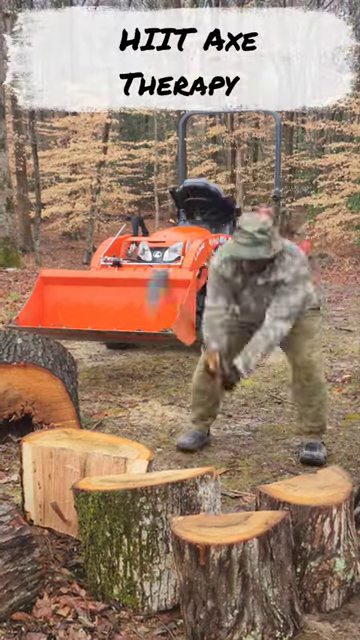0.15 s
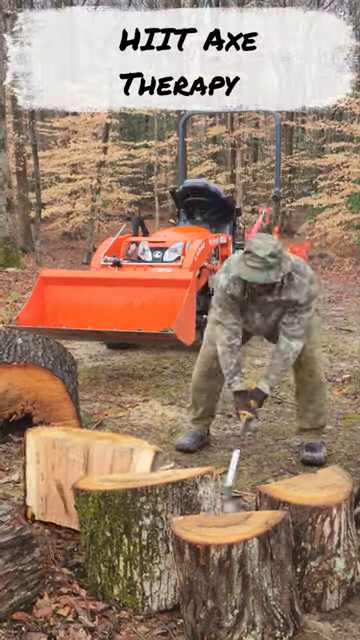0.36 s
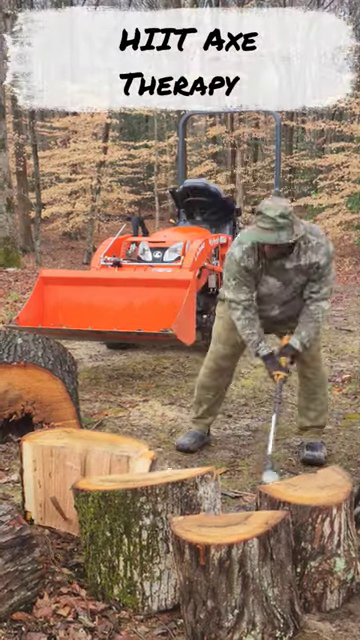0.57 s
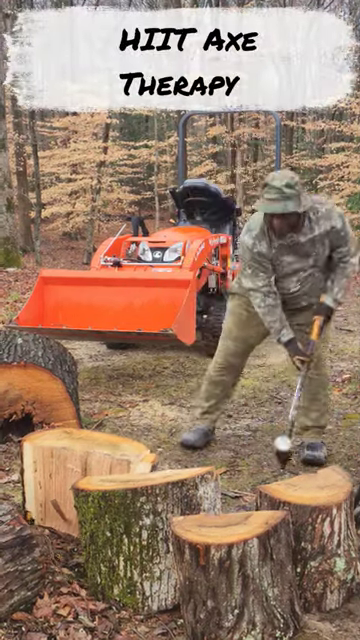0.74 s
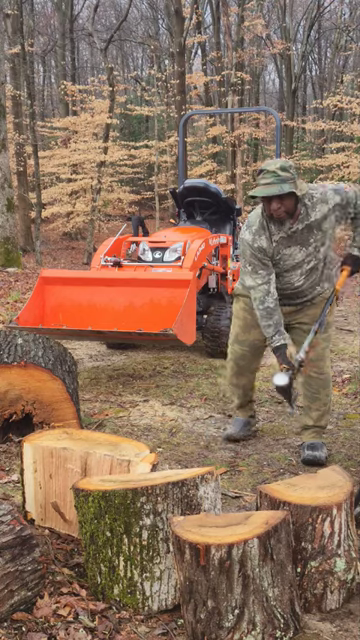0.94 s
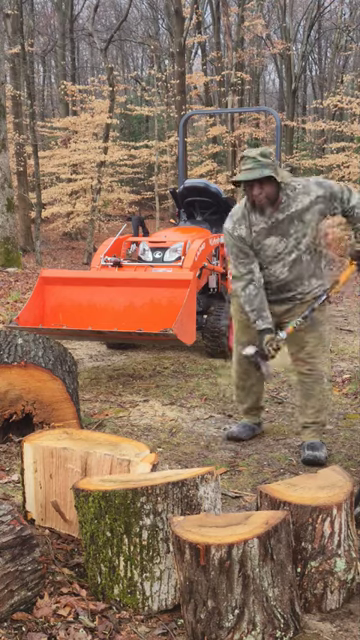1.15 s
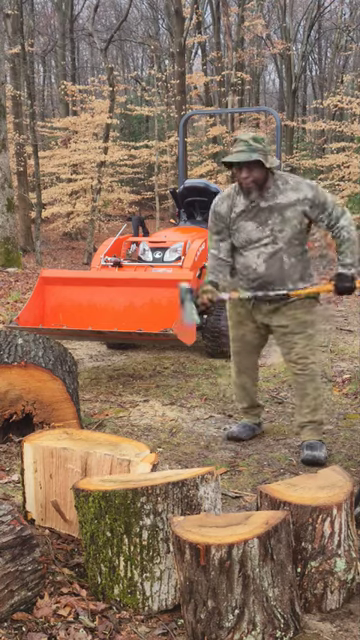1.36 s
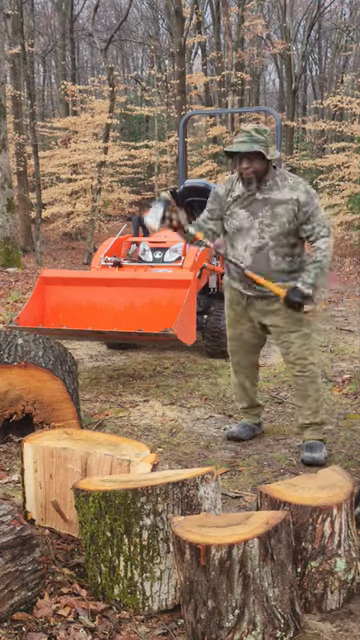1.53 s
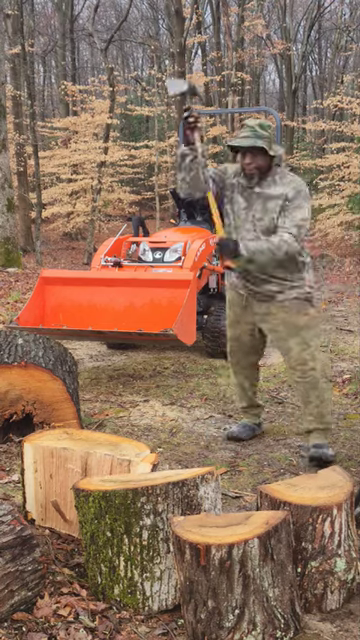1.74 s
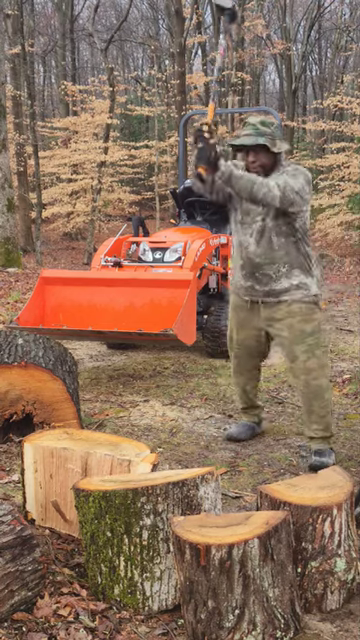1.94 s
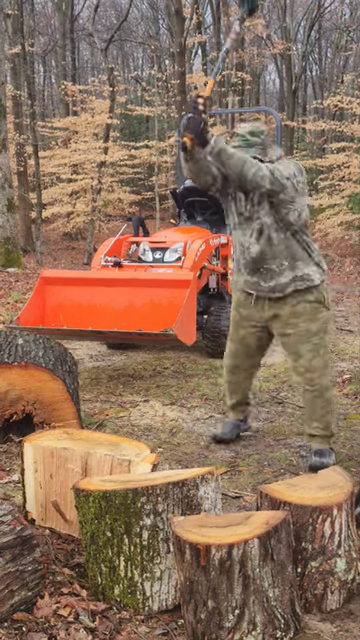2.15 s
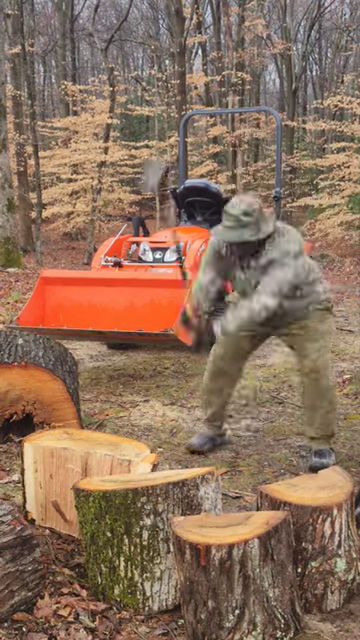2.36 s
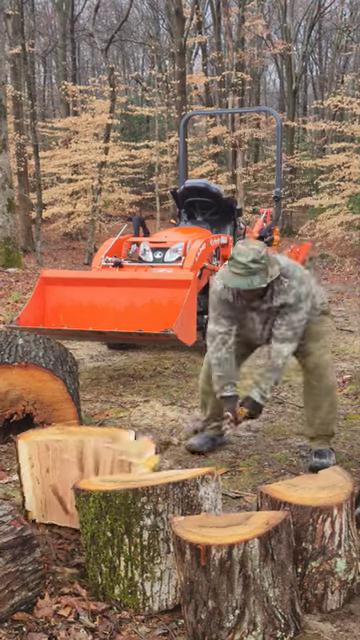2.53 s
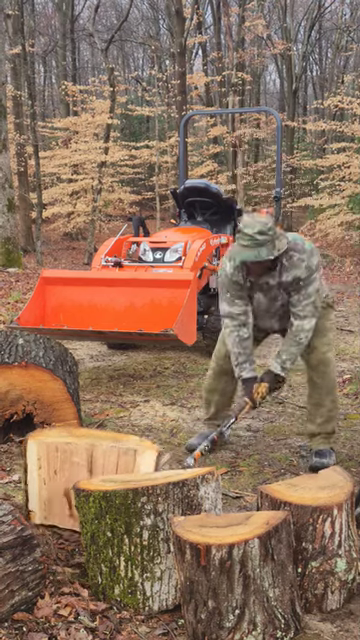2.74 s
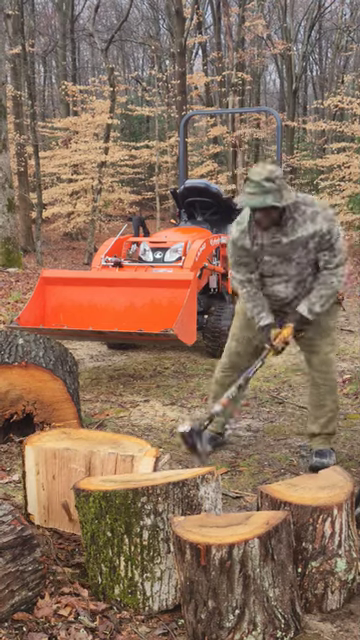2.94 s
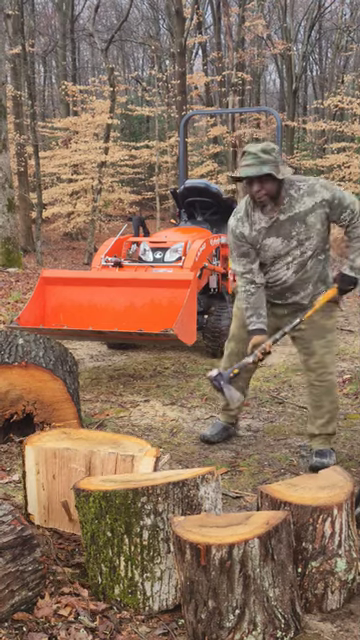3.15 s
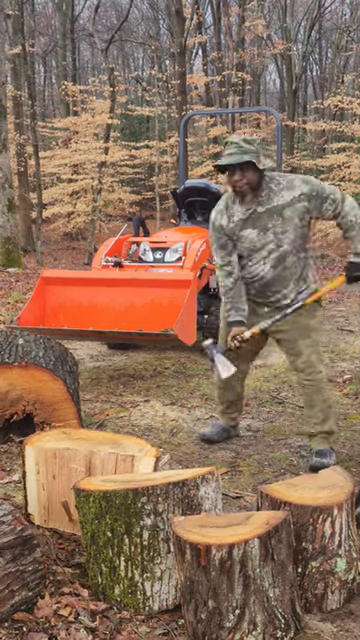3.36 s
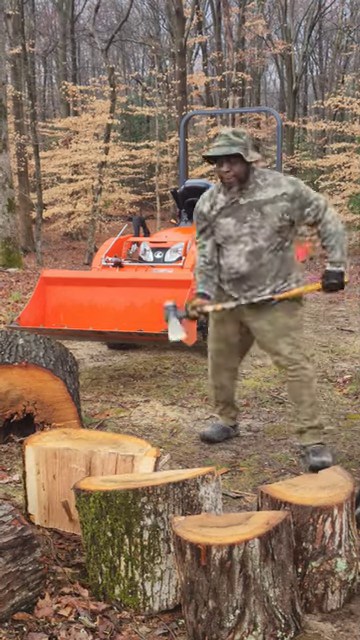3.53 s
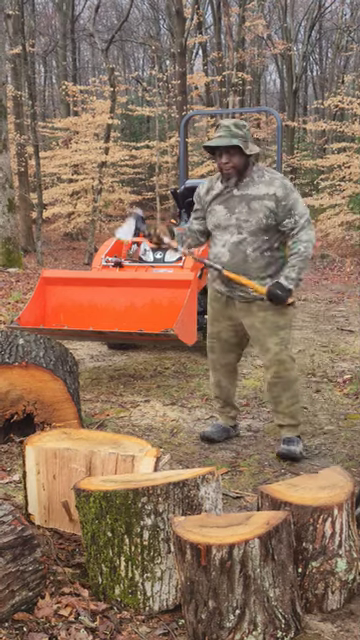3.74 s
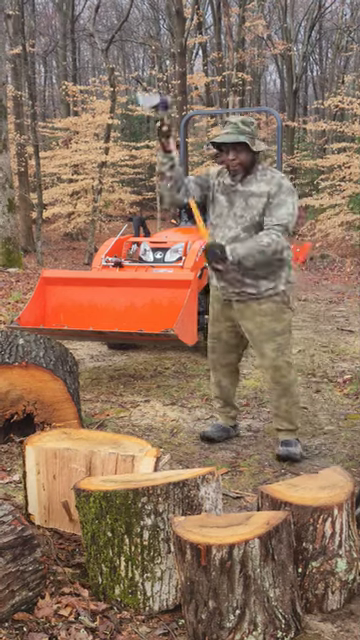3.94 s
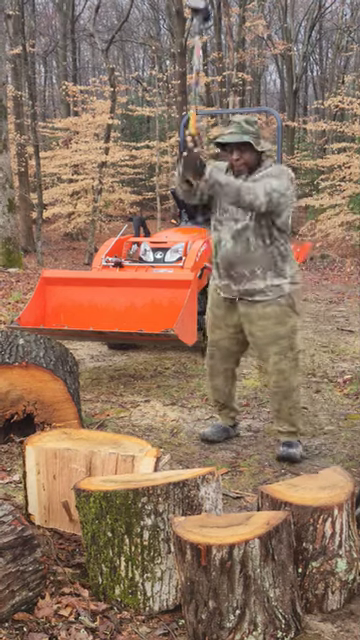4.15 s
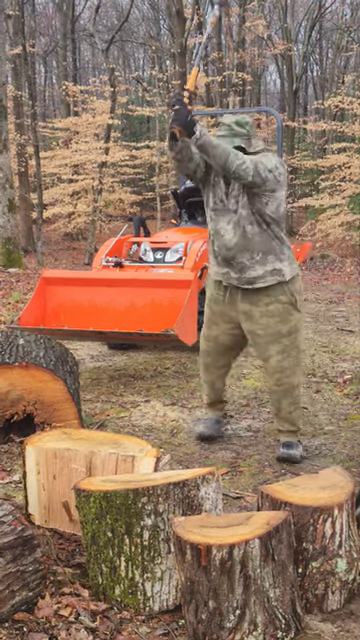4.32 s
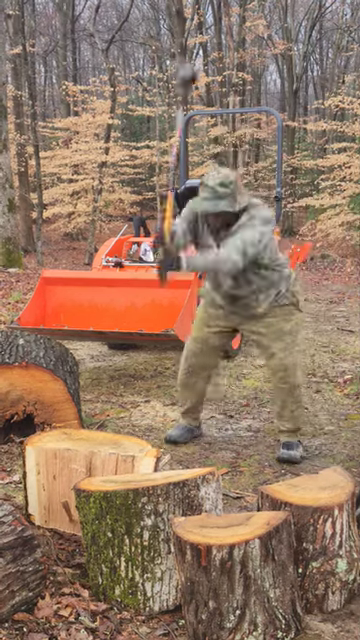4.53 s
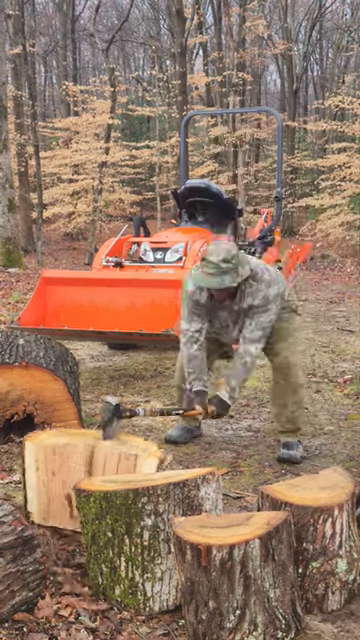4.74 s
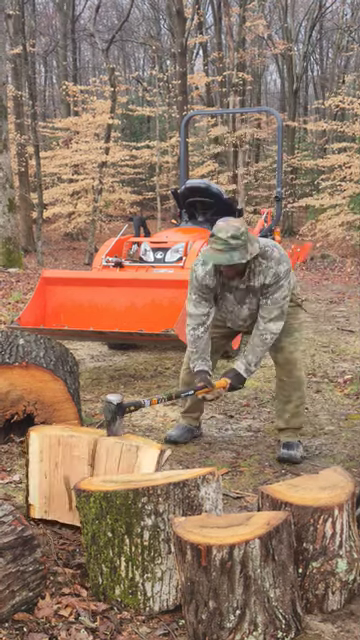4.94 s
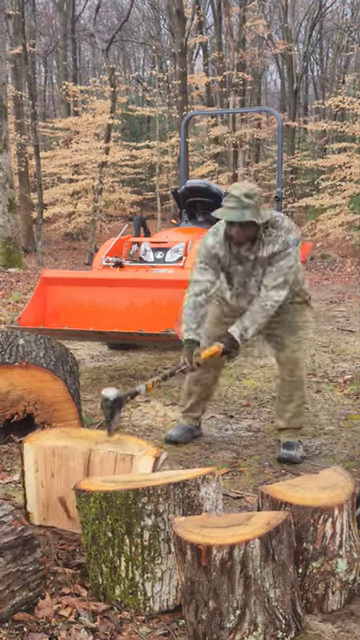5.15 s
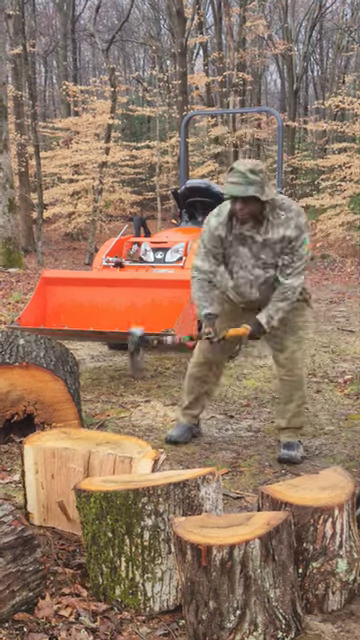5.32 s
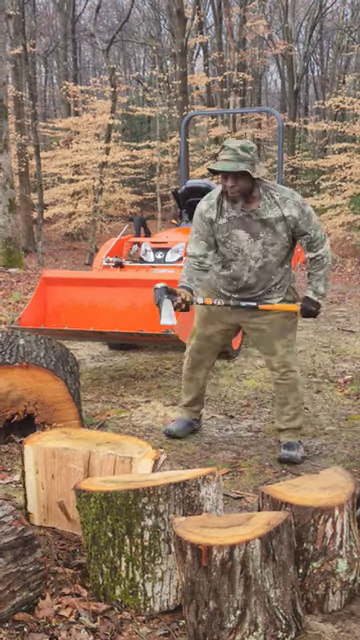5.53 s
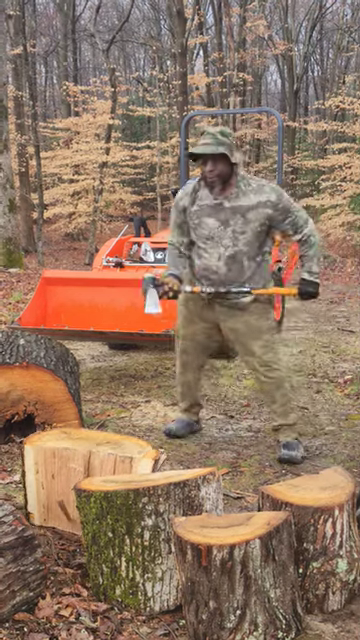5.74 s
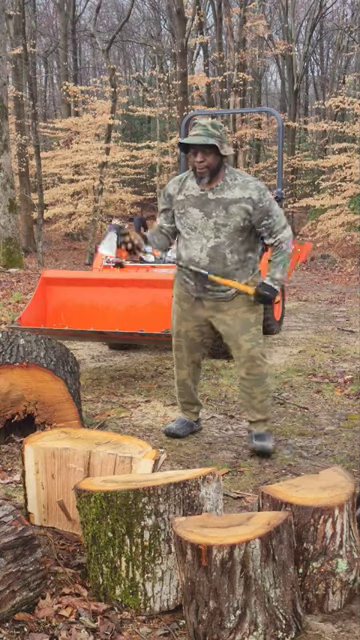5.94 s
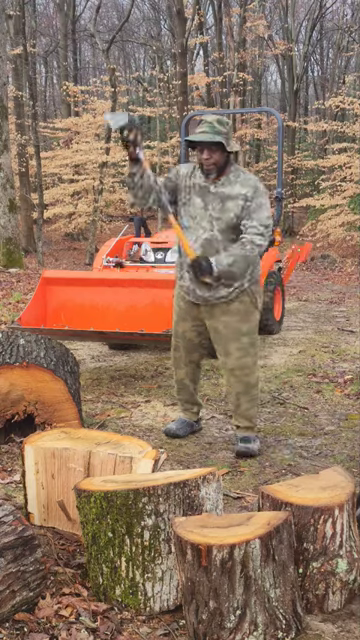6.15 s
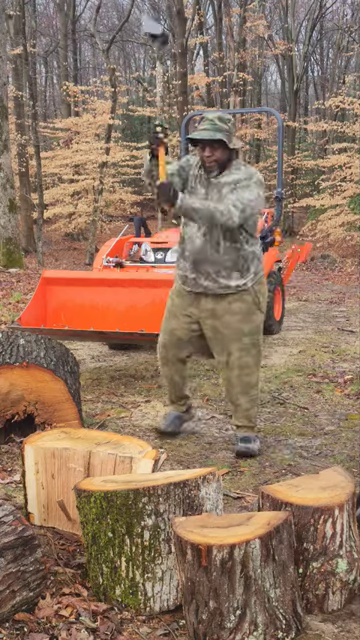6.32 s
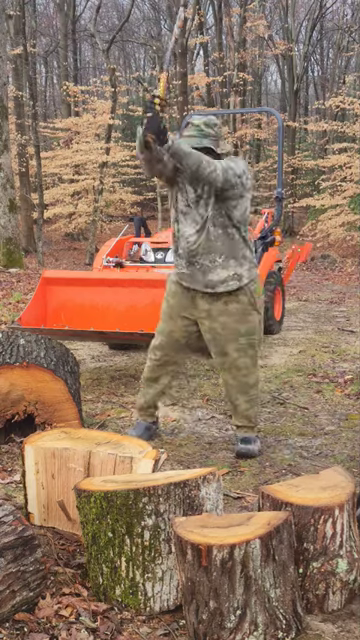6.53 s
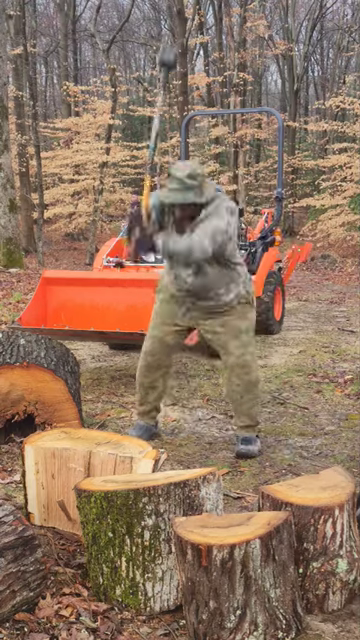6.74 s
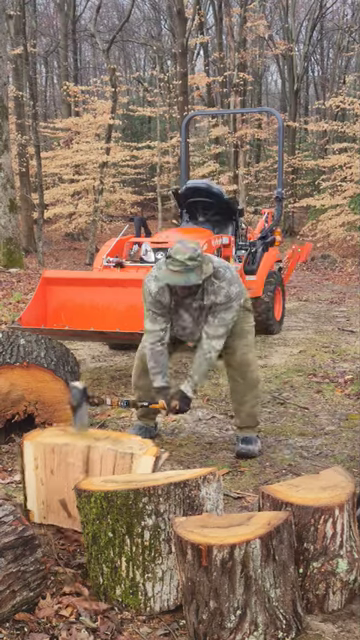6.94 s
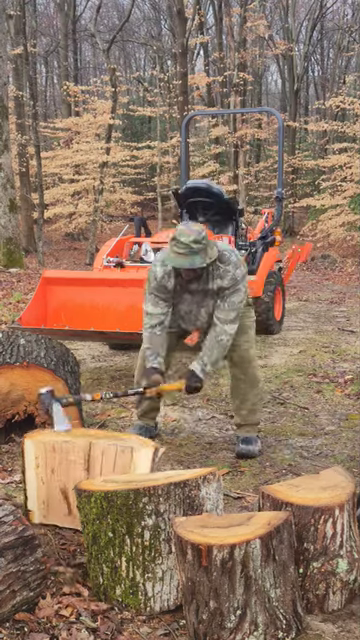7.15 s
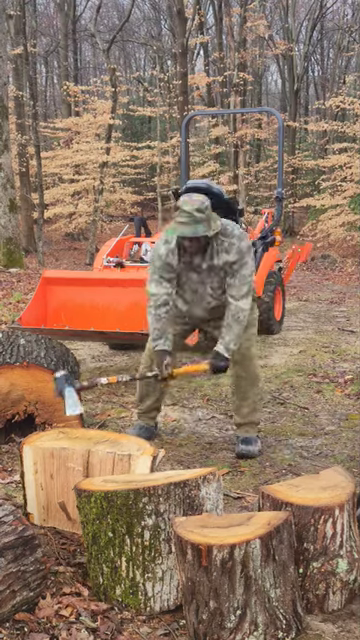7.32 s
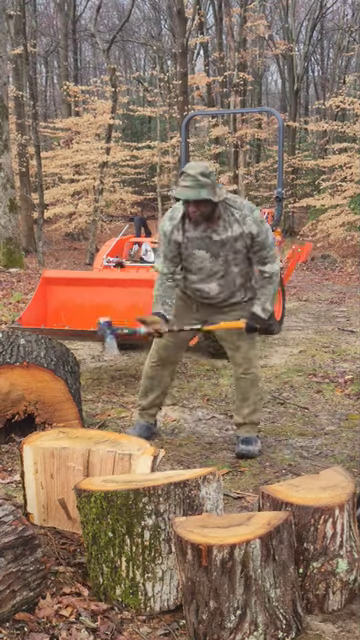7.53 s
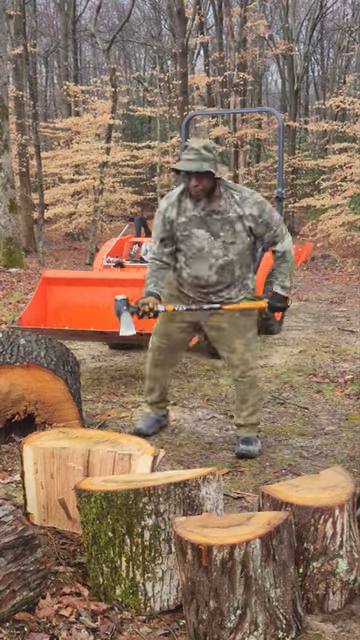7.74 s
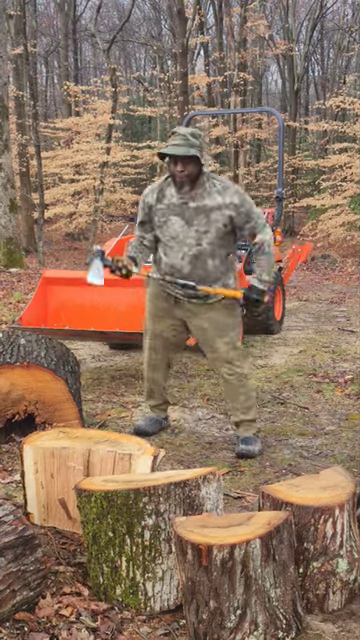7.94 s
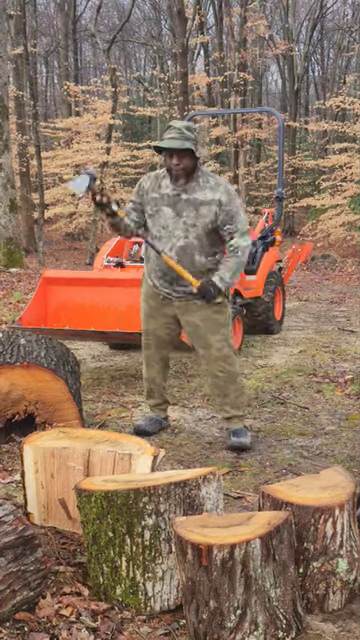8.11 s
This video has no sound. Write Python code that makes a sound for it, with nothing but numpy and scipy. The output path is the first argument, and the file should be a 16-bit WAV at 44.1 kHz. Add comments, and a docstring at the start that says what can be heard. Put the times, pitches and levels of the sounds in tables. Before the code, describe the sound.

An axe strikes a hardwood log four times, about two seconds apart, close to the microphone in the woods. Each sharp whack carries a crunch of fibres, a slight steel ring and a short echo, and some are followed by lighter knocks and falling chips. Between blows a jacket swishes and a glove rubs softly along the handle. Distant traffic rumbles low throughout, with very faint frog peeps and crow caws.

```python
"""A jacket swishes over a low rumble, then a splitting axe bites into a hardwood log, four times in all.
Each blow rings the log and the steel, tears fibres and thumps the ground; splinters scatter and the trunks
of the winter wood echo. Between blows a glove rubs along the handle and the jacket rustles again.
The rumble is distant traffic; far off, too, frogs peep and a crow caws."""
import sys
import numpy as np
from scipy import signal
from scipy.fft import rfft, irfft, next_fast_len
from scipy.io import wavfile
from scipy.ndimage import uniform_filter1d

SR = 44100
rng = np.random.default_rng(int(sys.argv[2]) if len(sys.argv) > 2 else 0)


def bounce(signal):
    """Save signal as a 16-bit WAV file at the path given by the first command-line argument."""
    frames = np.transpose(np.atleast_2d(signal))
    limited = np.clip(frames, -1, 1)
    pcm = np.round(limited * 32767).astype(np.int16)
    wavfile.write(sys.argv[1], SR, pcm)


N = 360738


def amp(db):
    """Turn decibels into a gain. Table levels are relative; a fade time (t60) is a drop of 60 dB."""
    return 10 ** (np.asarray(db) / 20)


def unit(x):
    """Scale x to an average strength (rms) of 1."""
    return x / np.sqrt(np.mean(x ** 2) + 1e-20)


def along(points, hz):
    """Read between (frequency, value) points on a log frequency axis."""
    f, v = np.transpose(points)
    return np.interp(np.log(hz + 1), np.log(f + 1), v)


def clock(length):
    """Sample times over a length in seconds."""
    return np.arange(int(length * SR)) / SR


def add(track, s, x):
    """Mix x into the track at s seconds."""
    i = max(round(s * SR), 0)
    track[..., i:i + x.shape[-1]] += x[..., :track.shape[-1] - i]


def filtered(x, response):
    """Turn each frequency of x up or down by response(hz)."""
    m = next_fast_len(x.shape[-1] + SR // 10)
    return irfft(rfft(x, m) * response(np.fft.rfftfreq(m, 1 / SR)), m)[..., :x.shape[-1]]


def noise(spectrum, shape, grain_db=0):
    """Noise with a given tone colour, made grainy by uneven sample sizes."""
    x = rng.standard_normal(shape) * amp(grain_db * rng.standard_normal(shape))
    return unit(filtered(x, lambda hz: amp(along(spectrum, hz))))


def burst(spectrum, t, apart, grain_db):
    """Stereo noise; apart sets how much left and right differ."""
    common, own = noise(spectrum, (2, len(t)), grain_db)
    return unit(np.array([common + apart * own, common - apart * own]))


def ring(modes, t, scatter_db=0):
    """The fading tones (modes) of a struck object; neighbours swing in opposite directions."""
    return sum((-1) ** k * amp(db + scatter_db * rng.standard_normal() - 60 * t / t60)
               * np.sin(2 * np.pi * hz * t) for k, (hz, db, t60) in enumerate(modes))


def jolt(t, hz, width):
    """One or two swings around t = 0, with no ring after them."""
    return np.sin(2 * np.pi * hz * t) * np.exp(-(t / width) ** 2 / 2)


# How alike left and right are: f/Hz, likeness (1 = the same)
LIKENESS = [(100, 1), (350, 0.86), (700, 0.43), (1400, 0.21), (3500, 0), (12000, 0.6)]
def diffuse(pair):
    """Two unrelated signals become sound that arrives from all around."""
    alike = lambda hz: np.clip(along(LIKENESS, hz), -1, 1)
    mid, side = filtered(pair, lambda hz: np.sqrt([(1 + alike(hz)) / 2, (1 - alike(hz)) / 2]))
    return np.array([mid + side, mid - side])


# Tone colour of the rumble: f/Hz, level/dB
TRAFFIC_COLOUR = [(20, -20), (70, -2), (116, -9.5), (180, -22), (333, -32), (620, -39), (1300, -49.5),
                  (2680, -53), (4680, -65), (7310, -59), (9130, -68), (15500, -72)]
def traffic(level_db=-48):
    """Distant traffic rumbles under a trace of hiss."""
    return amp(level_db) * unit(diffuse(noise(TRAFFIC_COLOUR, (2, N))))


# The echo among the trees: f/Hz, level/dB, fade time/s
ECHO_BANDS = [(60, -5, 2.5), (203, 5.5, 1.9), (510, -4.5, 4.5), (770, -1, 4.5), (1570, -1, 2.7),
              (2216, -1.5, 3.1), (4000, 1, 1.8), (8200, 1, 1.2), (14700, 0, 0.31)]
def forest(clearing_s=0.042, thinning=0.98, rise_s=0.012):
    """Trunks around the clearing echo a click evenly at first, then more weakly from farther away."""
    hz, t, hiss = signal.stft(rng.standard_normal((2, int(1.6 * SR))), SR, nperseg=256)
    bands = np.array(ECHO_BANDS)
    fade = amp(along(bands[:, :2], hz)[:, None] - 60 * t / along(bands[:, ::2], hz)[:, None])
    spread = (1 - np.exp(-t / rise_s)) / np.hypot(1, (t / clearing_s) ** 2) ** (thinning / 2)
    tail = diffuse(signal.istft(hiss * fade * spread, SR, nperseg=256)[1])
    return tail / np.linalg.norm(tail[0])


def echoes(x):
    """The forest's answer to a lasting sound."""
    return signal.fftconvolve(x[None], forest(), axes=1)[:, :N]


# Frog peeps: t/s, f/Hz, level/dB
FROG_PEEPS = [(0, 2630, -62), (0.101, 2764, -66), (1.96, 2600, -68.5), (2.21, 2620, -66), (2.42, 2600, -64),
              (5.331, 2680, -67.5), (7.34, 2604, -70), (7.589, 2667, -67.5), (7.83, 2650, -68),
              (7.96, 2790, -75)]
def frogs(rise=0.053, unsteadiness=0.014):
    """Each peep is a short, wavering tone that slides upward."""
    out, t = np.zeros(N), clock(0.11)
    for s, hz, db in FROG_PEEPS:
        waver = unit(uniform_filter1d(rng.standard_normal(len(t)), size=300))
        glide = hz * (1 + rise * (t / t[-1] - .5) + unsteadiness * waver)
        tone = np.sin(2 * np.pi * np.cumsum(glide) / SR)
        add(out, s, amp(db) * unit(np.hanning(len(t)) ** .5 * tone))
    return out


# Crow calls: t/s, level/dB
CROW_CAWS = [(1.475, -66.5), (1.915, -70.5), (2.26, -66), (3.2, -74), (3.55, -71.5)]
def crow():
    """Each caw is a hoarse tone whose pitch jumps up and sinks back."""
    out, t = np.zeros(N), clock(0.19)
    arch = np.sin(np.pi * (t / t[-1]) ** 0.84)
    throat = np.sin(2 * np.pi * np.cumsum(1270 + 260 * arch) / SR)
    fade = signal.windows.tukey(len(t), .15) * amp(-20 * t)
    for s, db in CROW_CAWS:
        rasp = 1 + .6 * noise([(100, 6.5), (200, -8.5), (500, -32.5)], len(t))
        add(out, s, amp(db) * unit(fade * throat * rasp))
    return out


# Stereo balance of nearby sounds: f/Hz, left over right/dB
BALANCE = [(500, 0.5), (2000, 2.5), (8000, -1.5), (12000, 2.5)]
def from_block(x, lag_s=6.5e-5):
    """Sound from the chopping block reaches the right microphone first; each side colours it a little."""
    side = np.array([[-1], [1]])
    delay = lambda hz: np.exp(1j * np.pi * hz * lag_s * side)
    return filtered(x, lambda hz: delay(hz) * amp(-side * along(BALANCE, hz) / 2))


def impact(x, echo_db=-14.5, bass_db=0, blur=0.086):
    """A hit and its echo. Each trunk faces another side of the log, so the echo's colour is blurred."""
    energy = np.cumsum(np.abs(rfft(x[0])) ** 2)
    below = lambda hz: np.interp(hz * x.shape[1] / SR, np.arange(len(energy)), energy)

    def colour(hz):
        half_band = blur * hz + 20
        band_energy = np.abs(below(hz + half_band) - below(hz - half_band))
        bass = amp(bass_db / (1 + (hz / 550) ** 4))
        return np.sqrt(band_energy * SR / (2 * half_band * x.shape[1])) * bass

    heard = amp(echo_db) * filtered(forest(), colour)
    add(heard, 0, from_block(x))
    return heard


# Jacket movements: t/s, length/s, level/dB
JACKET_SWISHES = [(0.043, 0.063, -44.5), (2.279, .04, -52.5), (2.299, 0.085, -47), (3.557, 0.13, -67.5),
                  (4.51, 0.054, -54.5), (5.565, 0.064, -63), (7.612, 0.086, -65.5)]
# Tone colour of the cloth: f/Hz, level/dB
CLOTH_COLOUR = [(180, -34.5), (300, -0.5), (922, -7), (1400, 0.5), (2000, -10), (5000, -15.5),
                (15500, -30.5)]
def jacket():
    """Stiff cloth swishes with a quick start and a slower finish."""
    out = np.zeros((2, N))
    for s, length, db in JACKET_SWISHES:
        t = clock(length)
        speed = np.sin(np.pi * (t / length) ** .5)
        add(out, s, amp(db) * speed * burst(CLOTH_COLOUR, t, apart=0.62, grain_db=6.0))
    return out


# Taps on the handle: t/s, level/dB
HANDLE_TAPS = [(1.785, -56.5), (5.192, -50.5), (6.545, -62.5)]
# Tone colour of a tap: f/Hz, level/dB
TAP_COLOUR = [(400, -22.5), (900, -10), (1300, -1.5), (2000, 0), (3000, -8.5), (6000, -23), (15000, -25.5)]
def handle():
    """The handle is tapped lightly as the grip changes."""
    out, t = np.zeros((2, N)), clock(0.036)
    for s, db in HANDLE_TAPS:
        add(out, s, amp(db - 60 * t / .08) * burst(TAP_COLOUR, t, apart=0.37, grain_db=0))
    return out


# Slides along the handle: t/s, length/s, level at full speed/dB
GLOVE_SLIDES = [(0.734, 0.2, -56.5), (0.97, 0.11, -58), (1.736, .32, -58.5), (3.015, .24, -57.5),
                (3.191, 0.16, -63), (4.002, .27, -60), (5.413, 0.14, -60.5), (5.524, 0.12, -60.5),
                (6.224, 0.3, -59.5), (7.2, 0.1, -59.5), (7.507, 0.11, -60), (7.586, 0.11, -59)]
# Tone colour of the rubbing: f/Hz, level/dB
GLOVE_COLOUR = [(1060, -39.5), (1800, -11.5), (3200, -12.5), (7400, -1), (10700, -16.5), (15000, -14.5)]
def glove(stick_db=1.5, friction_power=1.5):
    """The glove rubs louder the faster it moves, catching and slipping unevenly."""
    out = np.zeros((2, N))
    for s, length, db in GLOVE_SLIDES:
        t = clock(length)
        speed = np.sin(np.pi * t / length)
        catches = stick_db * noise([(20, 0), (80, -3.0), (300, -33), (2000, -76)], len(t))
        rub = burst(GLOVE_COLOUR, t, apart=0.99, grain_db=4.5)
        add(out, s, amp(db + catches) * speed ** friction_power * rub)
    return out


# Tone colour of wood fibres: f/Hz, level/dB
FIBRE_COLOUR = [(400, -12.5), (2300, -1), (5000, -4), (8000, 3), (11000, -10), (15000, -7)]
def fibre_noise(t, apart, grain_db, treble_db=0):
    """The crunch of wood fibres; treble_db turns its highest part up or down."""
    treble = [(hz, db + treble_db) for hz, db in FIBRE_COLOUR[-2:]]
    return burst(FIBRE_COLOUR[:-2] + treble, t, apart, grain_db)


# Falling bits: t/s, level/dB
CHIP_FALLS = [(2.385, -49.5), (2.6215, -30.5), (2.6912, -35.5), (2.703, -42.5), (5.189, -48),
              (7.056, -34.5), (7.0937, -36)]
def chips():
    """Bark and chips land with a short crunch."""
    out, t = np.zeros((2, N)), clock(0.036)
    for s, db in CHIP_FALLS:
        add(out, s, amp(db - 5 - 60 * t / 0.087) * fibre_noise(t, apart=.6, grain_db=6.5))
    return out


# Tone colour of flying splinters: f/Hz, level/dB
SPRAY_COLOUR = [(800, -19.5), (2500, -3.5), (8000, -1.5), (15000, -3.5)]
def splinters(blow_times, spray_db=-39, spray_t60=0.22, snap_db=-33, snap_hz=3880, snaps=40):
    """Each blow throws bits that patter down ever more faintly, while single fibres snap in the split."""
    out, t, brief = np.zeros((2, N)), clock(0.56), clock(.01)
    for s in blow_times:
        spray = burst(SPRAY_COLOUR, t, apart=0.83, grain_db=6.5)
        add(out, s, amp(spray_db - 60 * t / spray_t60) * spray)
        for chance, pitch, smallness in rng.random((snaps, 3)):
            late = -np.log(1 - .9 * chance)  # most snaps come early
            snap = np.sin(2 * np.pi * snap_hz * 2 ** (2 * pitch - 1) * brief) * amp(-60 * brief / .004)
            add(out, s + 0.1 * late, amp(snap_db - 6 * late - 10 * smallness) * snap)
    return from_block(out)


# The log's own tones: f/Hz, level/dB, fade time/s
LOG_MODES = [(124, -18.5, .09), (208, -6.5, 0.056), (301, -14, 0.029), (400, -8, .07), (440, -7, 0.06),
             (577, -9.5, .05), (695, -10.5, 0.12), (817, -9.5, 0.073), (1032, -11, 0.044),
             (1259, -11, 0.08), (1506, -11.5, 0.087), (2330, -15.5, .05), (2800, -18.5, 0.029),
             (3404, -20, 0.054)]
def log_ring(t, boost_db, fade_scale=1, scatter_db=0):
    """The struck log rings; boost_db(hz) says how strongly the hit wakes each tone."""
    return ring([(hz, db + boost_db(hz), t60 * fade_scale) for hz, db, t60 in LOG_MODES], t, scatter_db)


# Knocks on the log: t/s, level/dB, centre f/Hz, spread/octaves
LOG_KNOCKS = [(0.3225, -16.5, 682, .8), (2.5485, -7.5, 680, .25), (2.566, -12.5, 560, 0.4),
              (2.7326, -20, 230, .5), (4.7695, -11, 450, .4), (6.9965, -10.5, 490, .7),
              (7.1561, -20, 560.3, 0.74)]
def knocks():
    """Split wood and the axe bump the log, ringing it near one pitch; the touch cuts the ring short."""
    out, t = np.zeros((2, N)), clock(.15)
    for s, db, centre, spread in LOG_KNOCKS:
        near_centre = lambda hz: -20 * np.log10(1 + (np.log2(hz / centre) / spread) ** 2)
        knock = amp(db + 5) * log_ring(t, near_centre, fade_scale=0.48, scatter_db=2.5)
        add(out, s, impact(knock * np.ones((2, 1))))
    return out


# Blade squeak: t/s, length/s, f/Hz, level/dB
BLADE_SQUEAKS = [(4.845, 0.039, 1527, -43.5)]
def squeak():
    """The blade squeaks in the split: one brief, smooth tone."""
    out = np.zeros((2, N))
    for s, length, hz, db in BLADE_SQUEAKS:
        t = clock(length)
        tone = unit(np.hanning(len(t)) * np.sin(2 * np.pi * hz * t))
        add(out, s, impact(amp(db) * tone * np.ones((2, 1))))
    return out


# The axe head's own tones: f/Hz, level/dB, fade time/s
STEEL_MODES = [(1472, -6.5, 0.42), (1540, -3.5, 0.36), (2440, -17, 0.45), (2540, -13.5, 0.23),
               (3700, -20, 0.33)]
def steel_ring(t, upper_db, pitch_sag=0.065, grip_s=0.05, rise_s=0.03):
    """The wood grips the blade and lowers its pitch; the head rings out as the wood lets go."""
    slowed = t - pitch_sag * grip_s * (1 - np.exp(-t / grip_s))
    tones = ring(STEEL_MODES[:2], slowed) + amp(upper_db) * ring(STEEL_MODES[2:], slowed)
    return (1 - np.exp(-t / rise_s)) * tones


# Tone colour of the bite: f/Hz, level/dB
CRACK_COLOUR = [(200, -6.5), (700, 5), (1600, 1.5), (4000, -8), (9000, -20), (15000, -22)]
def edge_crack(t, level_db=-12, t60=0.048, rise_s=0.002):
    """The edge bites into the wood with a sharp crack."""
    loudness = amp(level_db - 60 * t / t60) * (1 - np.exp(-t / rise_s))
    return loudness * burst(CRACK_COLOUR, t, apart=0.18, grain_db=3.5)


# Steps of the split: t/s, level/dB
GRAIN_SNAPS = [(0.2925, -12), (2.5419, -8.5), (4.7641, -9), (6.989, -13.5), (6.9913, -11)]
# Tone colour of a step: f/Hz, level/dB
SNAP_COLOUR = [(400, -5), (1400, 5), (3500, -3), (8000, -4), (11000, -16.5)]
def grain_snaps(t, blow_s, t60=0.0072):
    """The grain splits in sharp steps as the blade wedges in."""
    out = np.zeros((2, len(t)))
    for s, db in GRAIN_SNAPS:
        if 0 <= s - blow_s < t[-1]:
            add(out, s - blow_s, amp(db - 60 * t / t60) * burst(SNAP_COLOUR, t, apart=0.34, grain_db=1))
    return out


# Pitches for the next table: f/Hz
SPOT_PITCHES = (220, 420, 560, 720, 1050, 1400, 2340, 3000)
# Where the edge lands favours some tones. One row a blow: level/dB at each of those pitches
SPOT_LEVELS = [(-4.5, -1, 2.5, 2.5, -1.5, -5.5, -7.5, -3.5), (-13, 1.5, -2, -7, -8.5, 0, -5.5, 0),
               (1.5, 0, -8.5, -10.5, -2.5, -2.5, 5, -2.5), (2.5, -3.5, -2.5, -0.5, -0.5, 0, -3.5, -3.5)]
# Axe blows: t/s, jerk level/dB, jerk f/Hz, time until the head stops/s, ground thud/dB, steel/dB,
# its upper tones/dB, time until the wood gives/s, tearing/dB, its fade time/s, its treble/dB,
# echo/dB, echo bass/dB
AXE_BLOWS = [(0.2902, -2.5, 431, 0.0028, -29, -33.5, 0, .0105, -17.5, 0.062, 3.5, -13, -6.5),
             (2.539, -1, 429.4, 0.003, -31, -35, -2, .0100, -27, .06, 0.5, -12, 1.5),
             (4.7619, -6, 382, .0034, -29.5, -28.5, -2, 0.0057, -22.5, .06, -1, -13, 2.5),
             (6.9881, -6, 200.8, 0.0037, -22, -26, 3.5, 0.0075, -20, .02, -6, -15, 2)]
def axe():
    """The edge bites, the log rings and jerks as the head stops, the wood tears and the ground thuds."""
    out, t = np.zeros((2, N)), clock(.4)
    for blow, spot in zip(AXE_BLOWS, SPOT_LEVELS):
        s, jerk_db, jerk_hz, stop_s, thud_db, steel_db, upper_db = blow[:7]
        give_s, tear_db, tear_t60, treble_db, echo_db, bass_db = blow[7:]
        spot_colour = list(zip(SPOT_PITCHES, spot))
        wood = amp(-9) * log_ring(t, lambda hz: along(spot_colour, hz))
        jerk = amp(jerk_db) * jolt(t - stop_s, hz=jerk_hz, width=0.4 / jerk_hz)
        thud = amp(thud_db + 2) * jolt(t - .024, hz=65, width=0.011)  # soft ground yields late and slowly
        steel = amp(steel_db) * steel_ring(t, upper_db)
        crack = edge_crack(t)
        # the tearing swells until the wood gives way, then dies down
        swell_db = np.where(t < give_s, -5 * (1.5 - t / give_s), -60 * (t - give_s) / tear_t60)
        tear = amp(tear_db + swell_db) * fibre_noise(t, apart=0.49, grain_db=4.5, treble_db=treble_db)
        hit = wood + jerk + thud + steel + crack + tear + grain_snaps(t, s)
        add(out, s, impact(hit, echo_db, bass_db))
    return out


def scene():
    """Mix the chopping, the small sounds nearby, the far animals (mostly echo) and the traffic."""
    chopping = axe() + squeak() + splinters([blow[0] for blow in AXE_BLOWS]) + knocks()
    small = chips() + handle() + glove() + jacket()
    nearby = from_block(small) + amp(-19.5) * echoes(small[0])
    calls = frogs() + crow()
    animals = amp(-12.5) * calls + amp(-5.5) * echoes(calls)
    return chopping + nearby + animals + traffic()


def record(dry, ceiling=0.99, hardness=4, top_hz=15800):
    """Round off the loudest peaks and cut the very highest treble."""
    rounded = dry / (1 + np.abs(dry / ceiling) ** hardness) ** (1 / hardness)
    return filtered(rounded, lambda hz: 1 / (1 + (hz / top_hz) ** 100))


dry = scene()
out = record(dry)
bounce(out)
```